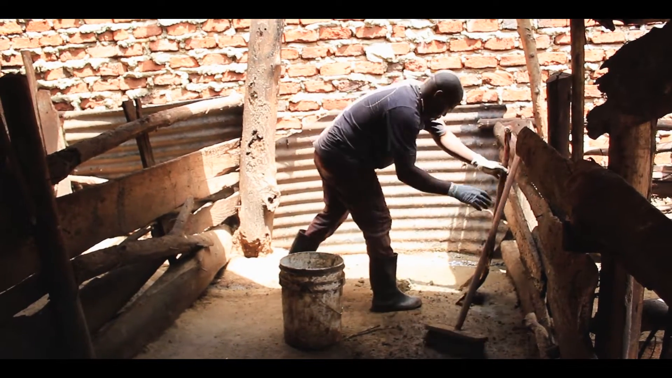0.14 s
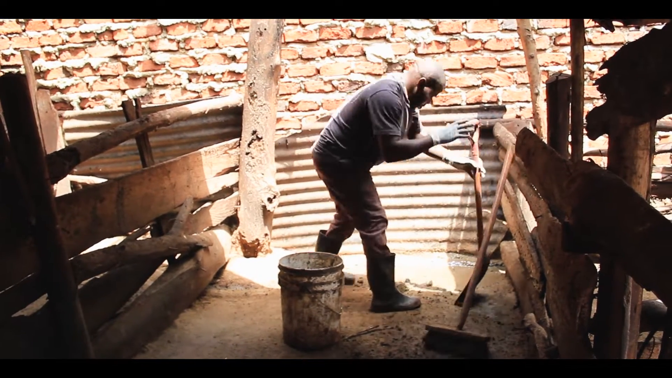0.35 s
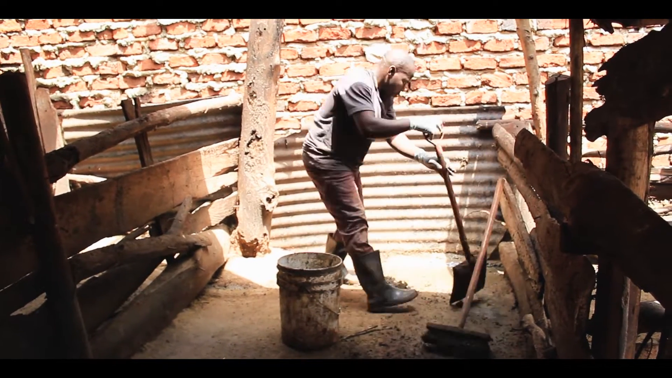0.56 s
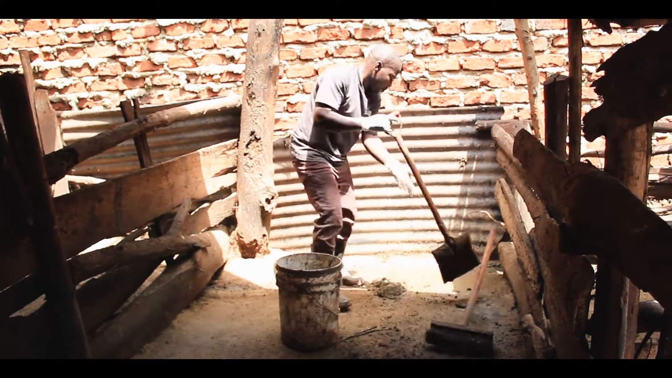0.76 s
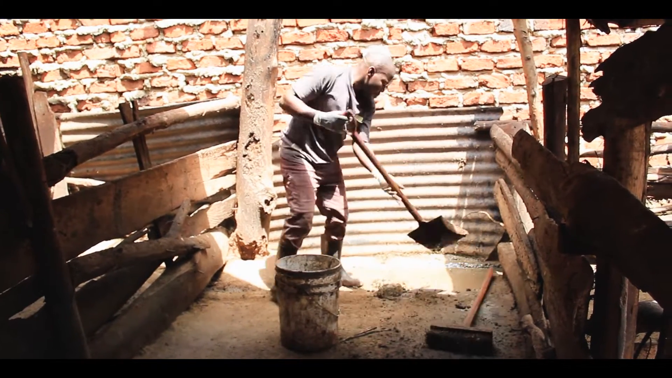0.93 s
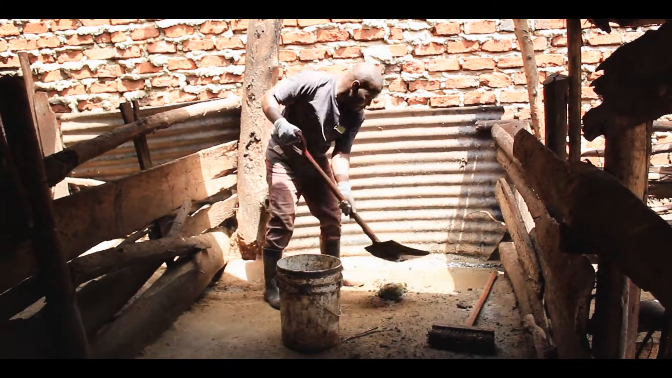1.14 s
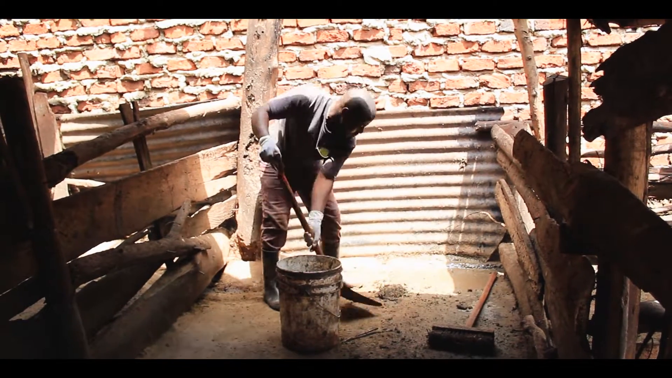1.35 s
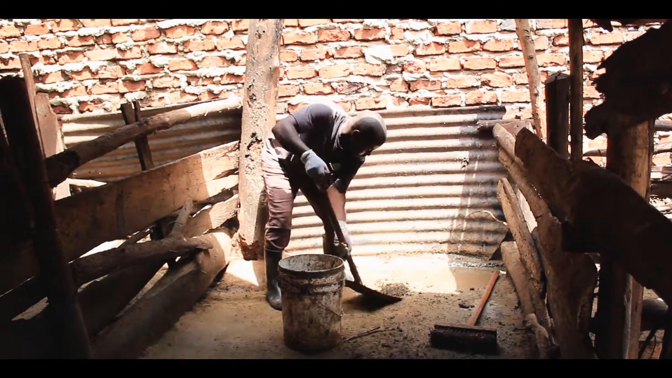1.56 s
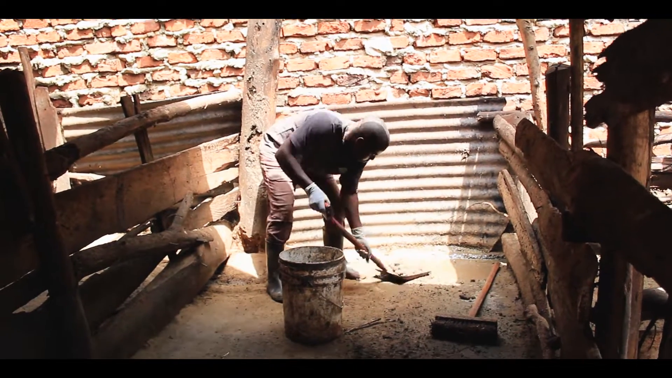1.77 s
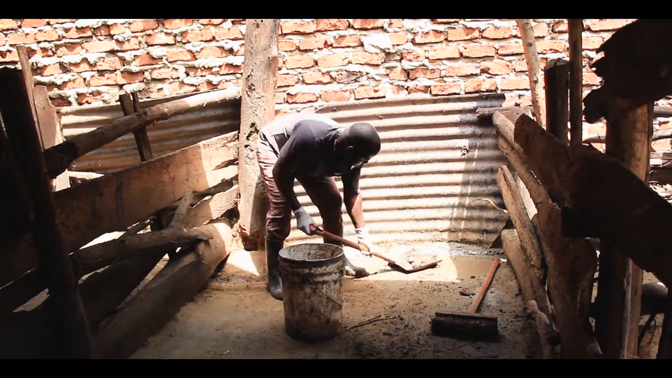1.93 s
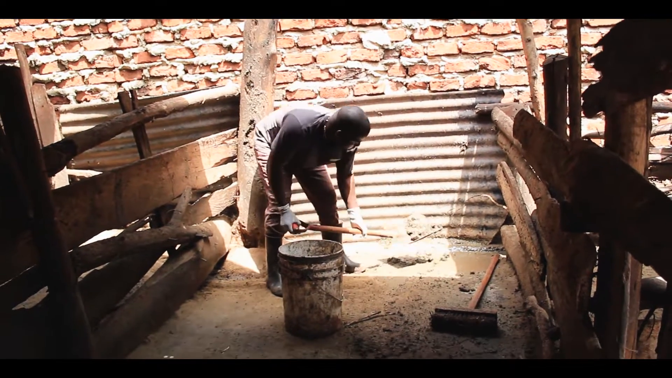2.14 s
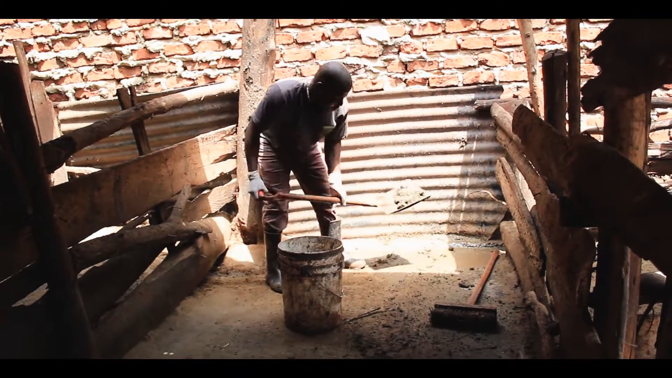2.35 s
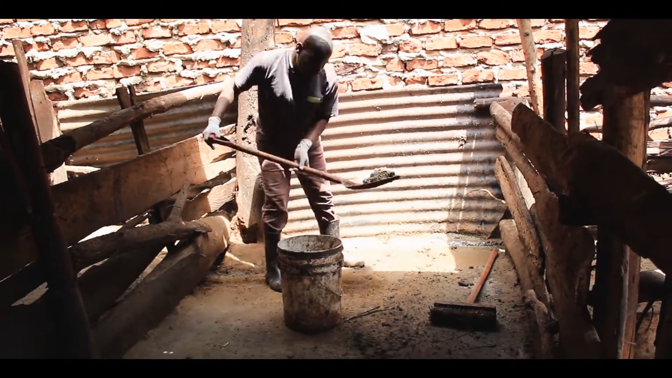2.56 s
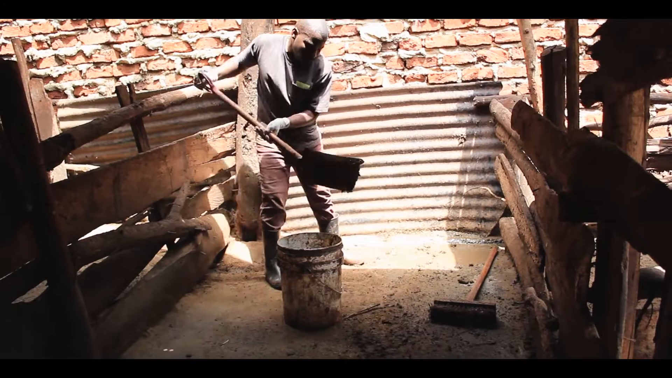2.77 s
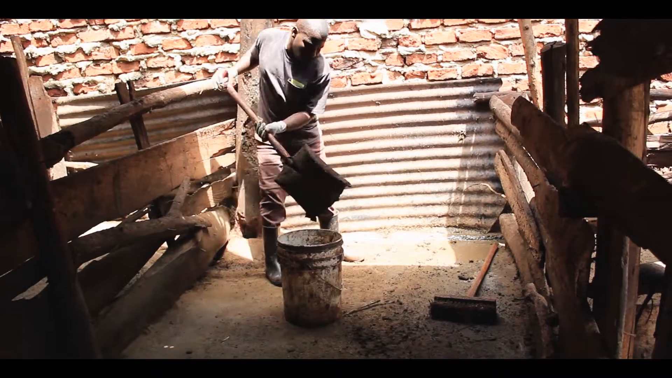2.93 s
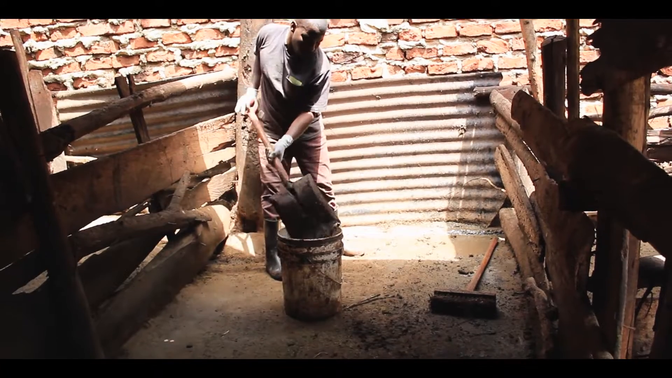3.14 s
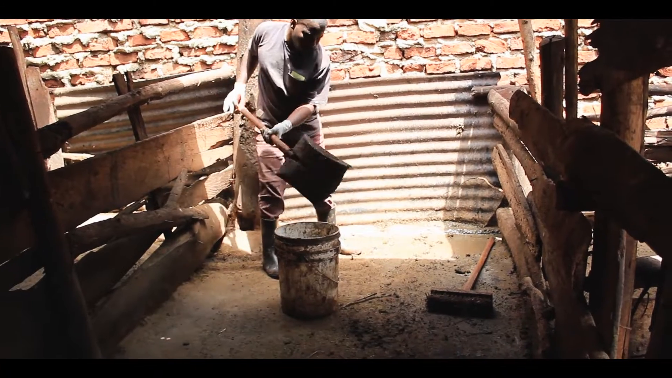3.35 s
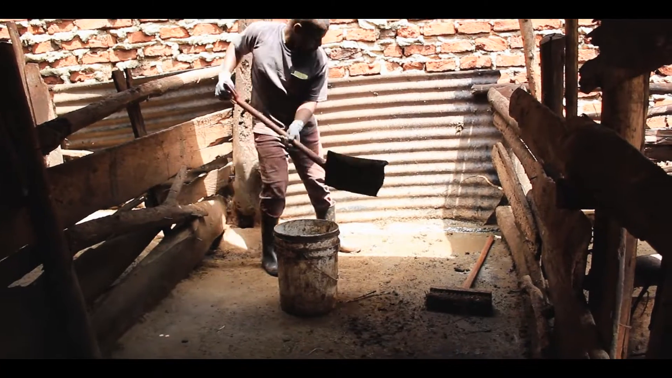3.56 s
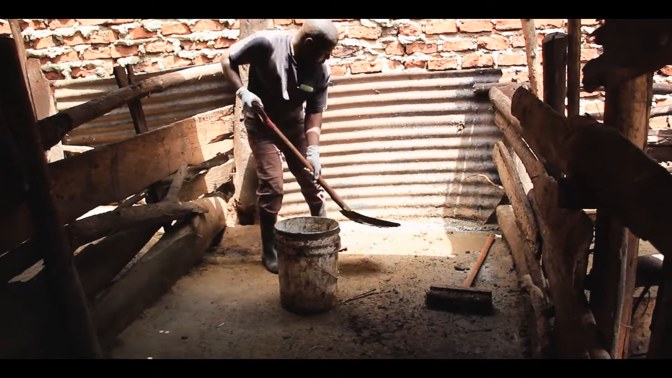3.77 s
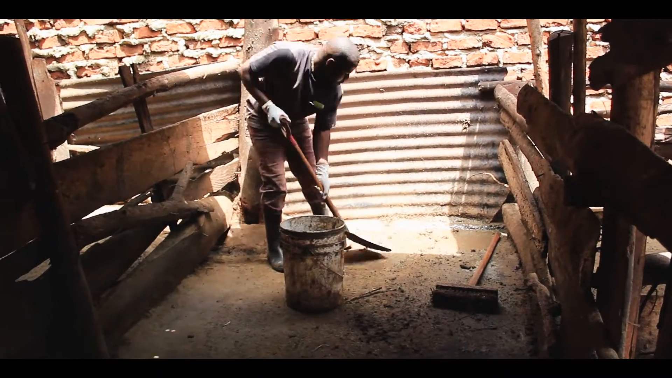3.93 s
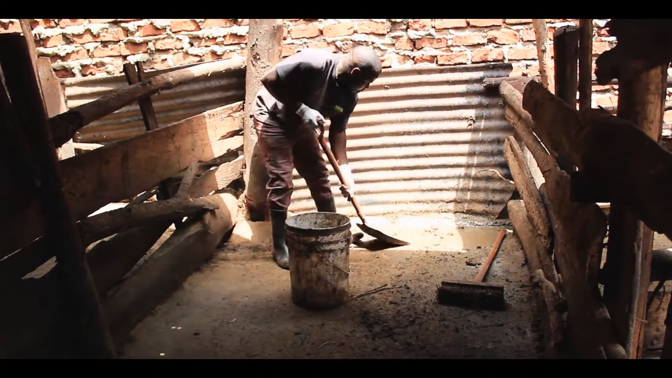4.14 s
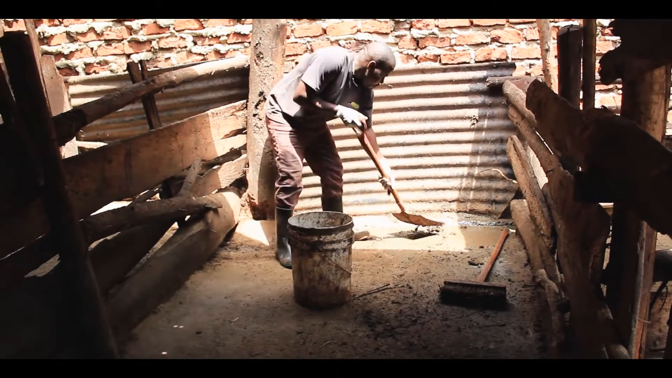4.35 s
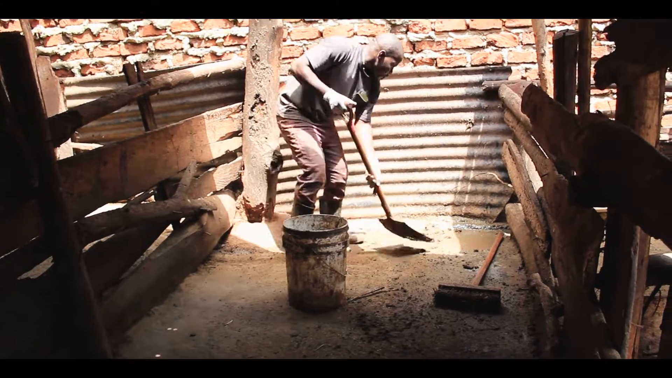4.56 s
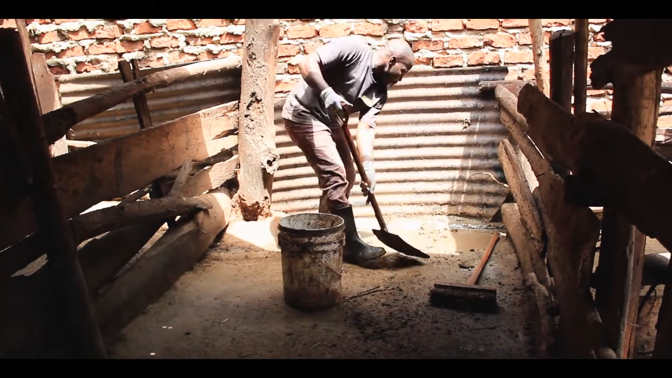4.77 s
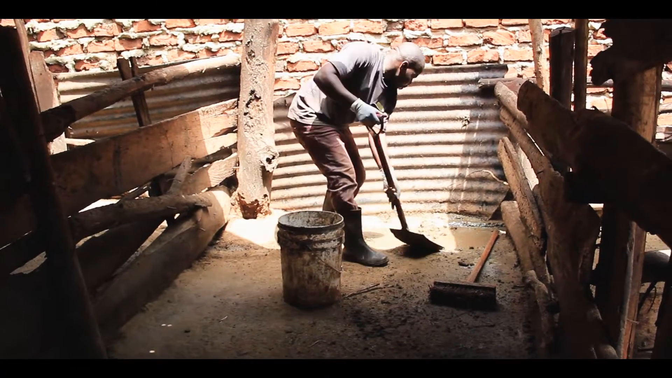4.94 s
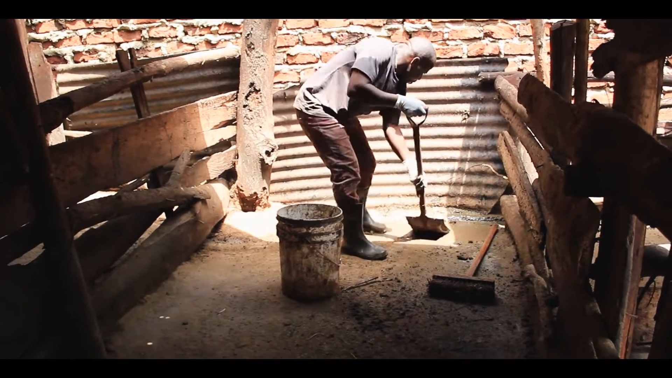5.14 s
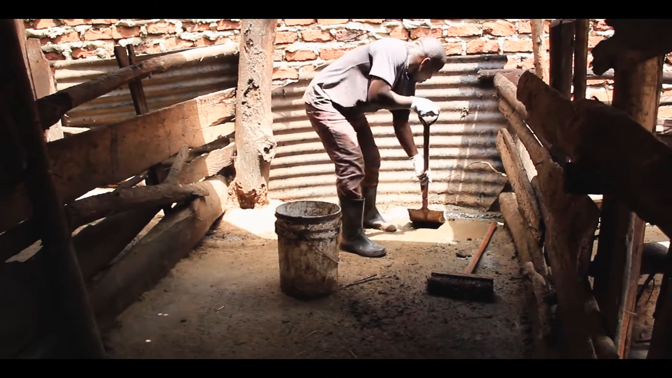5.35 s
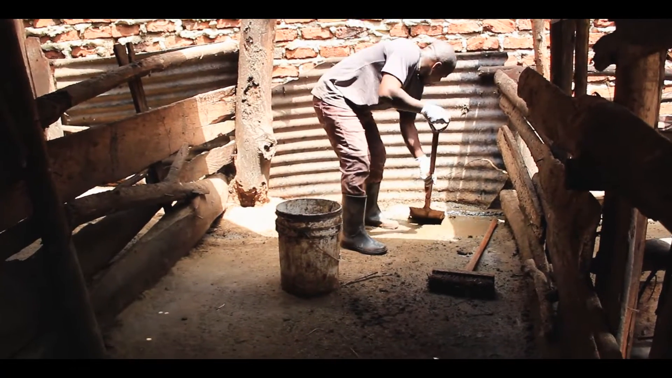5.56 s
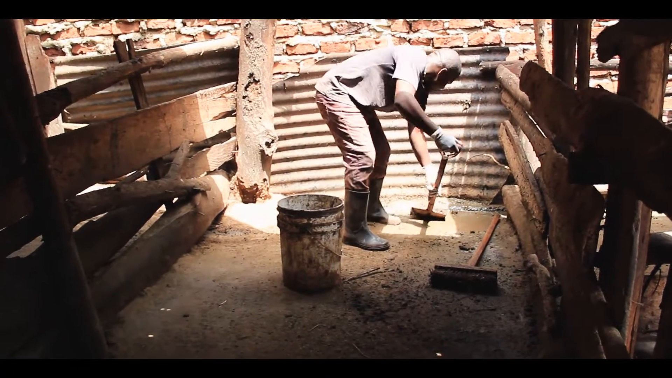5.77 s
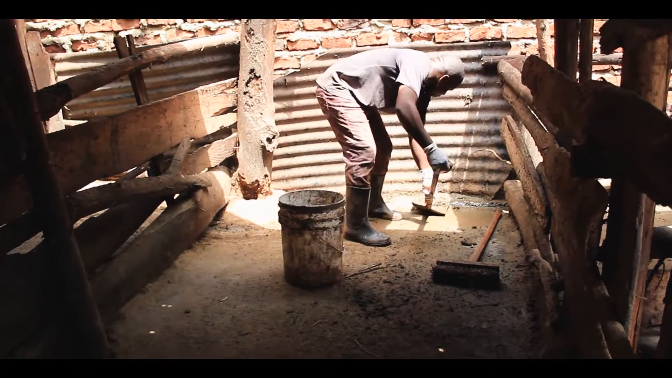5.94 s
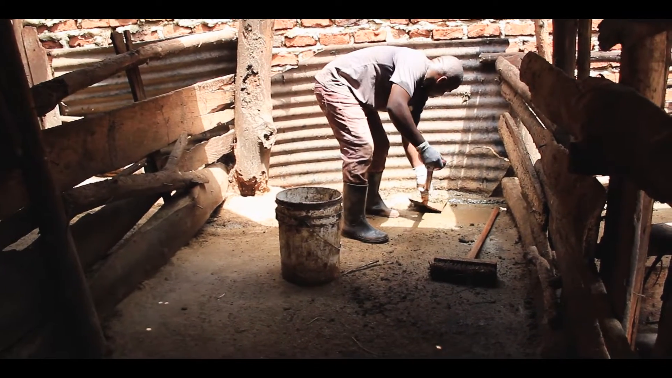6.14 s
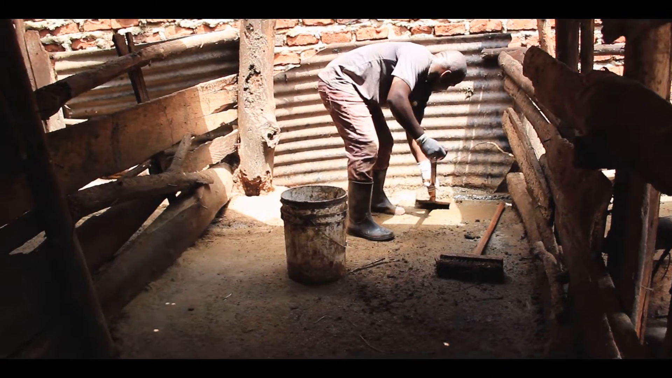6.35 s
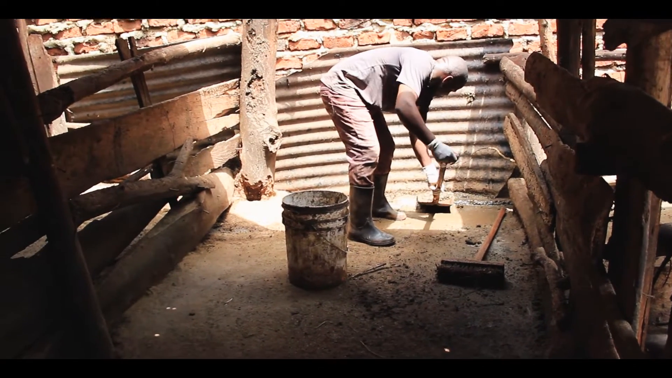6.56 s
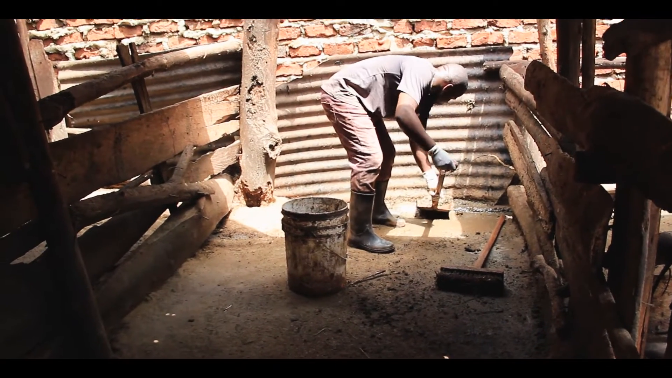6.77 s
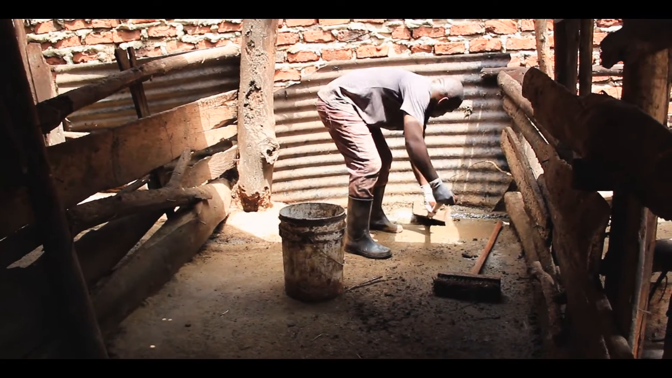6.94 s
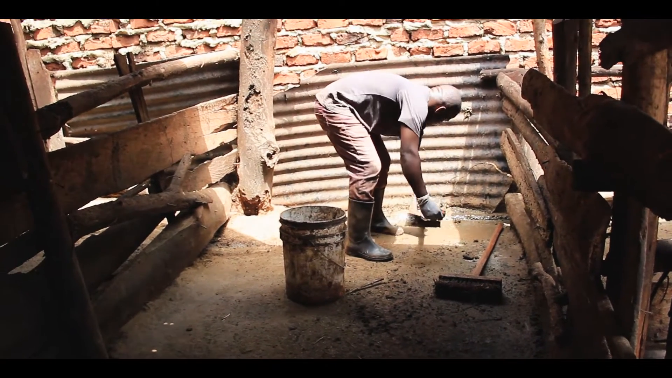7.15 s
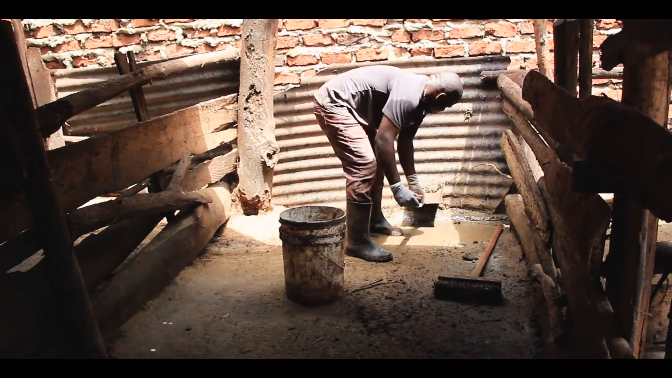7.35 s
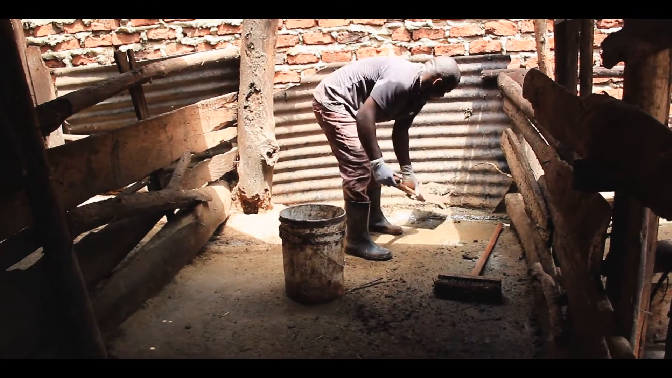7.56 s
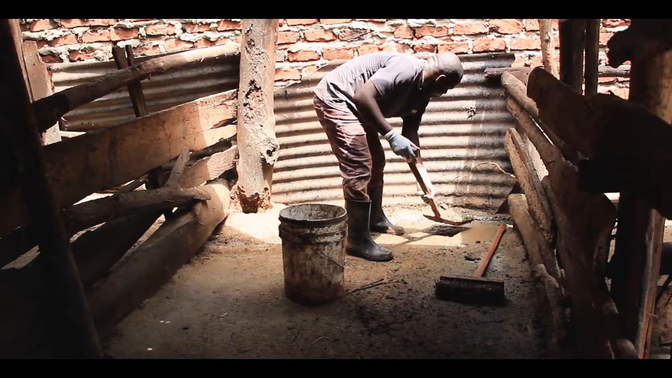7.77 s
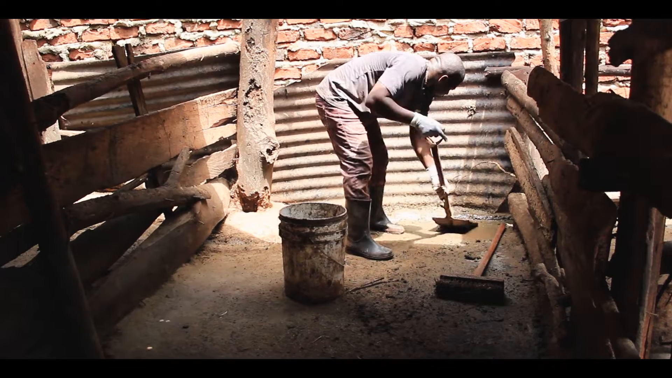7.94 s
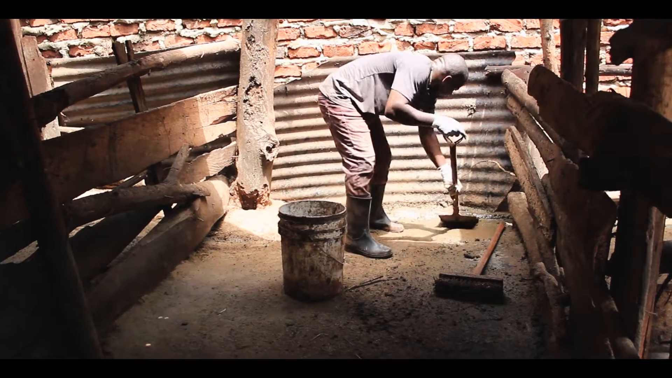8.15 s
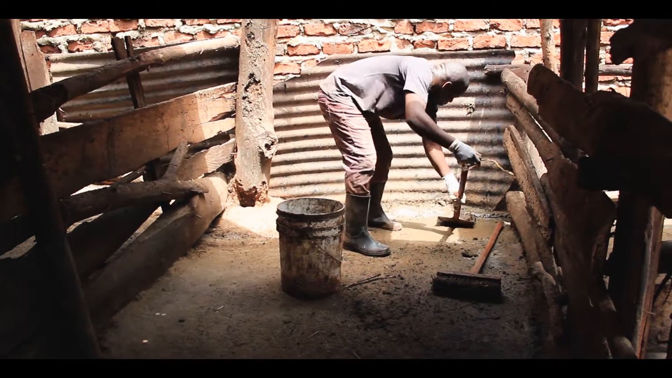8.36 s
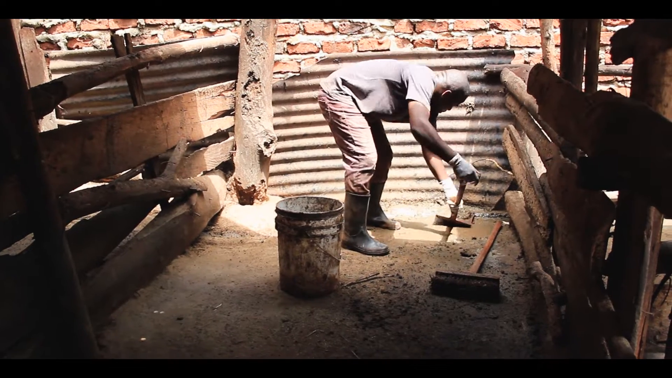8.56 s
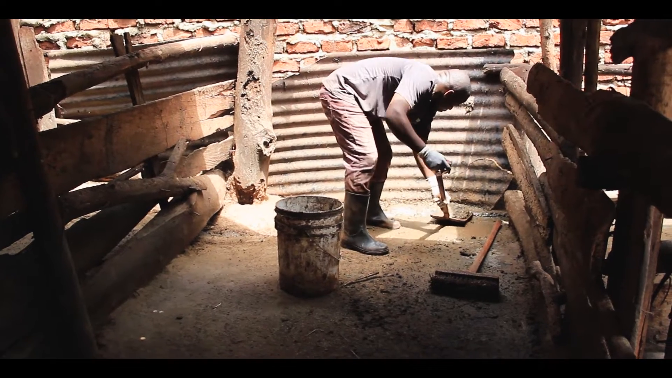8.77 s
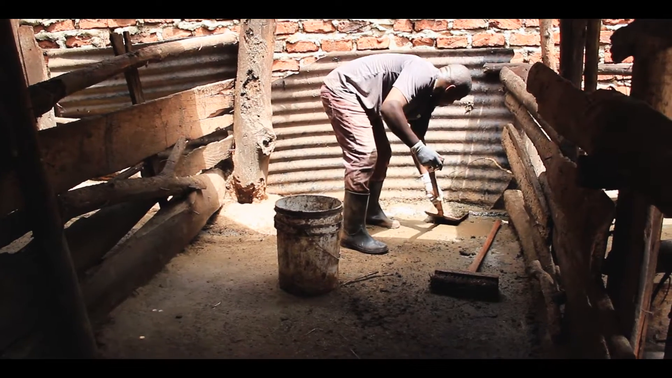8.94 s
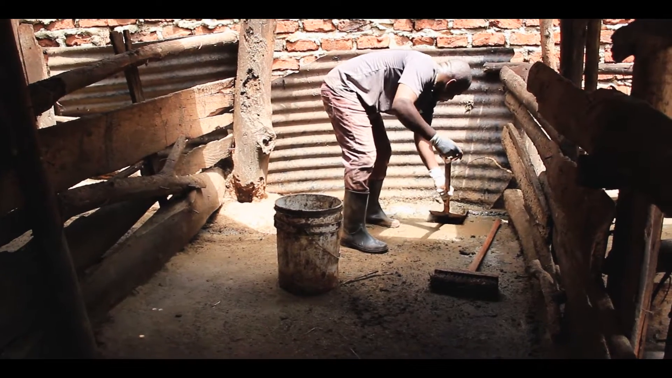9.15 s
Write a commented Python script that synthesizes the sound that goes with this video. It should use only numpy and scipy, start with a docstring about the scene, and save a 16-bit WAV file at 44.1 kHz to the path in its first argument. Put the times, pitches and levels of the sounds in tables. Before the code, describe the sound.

A loud wooden and metallic knock opens, then a very hard ringing clang near one second overloads. A spade rasps across a gritty floor in a strong push, pauses while faint rising glugs come from next door, then scrapes again in rougher strokes. Short scuffs, boot thuds, a small squeak and more knocks follow. Close microphone, small dry pen, quiet steady outdoor wash.

```python
"""Spade scraping in a small pen

A spade scrapes grit and dung over the hard floor of a timber and tin pen: shaped noise under a pressure curve.
The blade knocks and rings as noise bursts with damped modes, and squeaks once as a short harmonic tone.
Boots thud as decaying sines; short rising glugs from next door, like an animal drinking, are gliding tones.
Sparse reflections and a steady outdoor wash surround them; the loudest blows overload at full scale."""
import sys
import numpy as np
from scipy import signal
from scipy.io import wavfile
from scipy.ndimage import uniform_filter1d

SR = 44100
rng = np.random.default_rng(int(sys.argv[2]) if len(sys.argv) > 2 else 0)


def to_wav(s):
    """Save 16-bit WAV."""
    ch = np.atleast_2d(s).T  # columns
    pcm = np.round(np.clip(ch, -1, 1) * 32767)  # PCM
    wavfile.write(sys.argv[1], SR, pcm.astype(np.int16))


N = 406161  # samples

# spectrum of the outdoor wash: (frequency [Hz], relative density [dB])
AIR_SPECTRUM = [(15, -48), (25, -3.5), (161, 2), (299, 12), (436, 7.5), (1030, -1), (1320, -7.5),
                (1970, -8.5), (3380, -19), (8020, -6.5), (14100, -48), (15700, -63)]
AIR_DB = -50  # rms level of the wash

# spectrum of snapping grit: (frequency [Hz], relative density [dB])
GRIT_SPECTRUM = [(120, -55), (307, -14.5), (566, -10), (886, -5.5), (1160, -3.5), (1450, -3), (3000, -5.5),
                 (6680, -12), (10300, -25.5), (15700, -59)]
# three long pushes of the blade along the floor, one curve each: (time [s], pressure [dB])
PUSH_CURVES = [
    [(1.537, -25), (1.555, -15), (1.588, -20), (1.63, -14), (1.665, -4), (1.72, -9), (1.77, -10),
     (1.79, -16), (1.945, -27)],
    [(4.122, -29), (4.152, -19), (4.34, -10), (4.4, -11), (4.49, -38)],
    [(4.95, -13), (5.07, -19), (5.188, -16), (5.196, -7), (5.278, -14), (5.36, -13), (5.55, -13),
     (5.612, -35)],
]
EDGE_DB_PER_S = 6000  # how fast a push lands and lifts
# short scuffs of blade and boots:
# (time of peak [s], pressure [dB], swell over 20 dB [s], fade over 20 dB [s])
SCUFF_EVENTS = [(0.529, -35, .1, .1), (0.66, -33, .01, .1), (0.74, -18, .008, .12), (2.66, -37, .01, .12),
                (2.997, -36, .02, .15), (3.302, -27, .03, .1), (5.25, -7, .03, .04), (5.432, -7, .03, .03),
                (3.836, -34, .15, .3), (5.627, -26, .015, .08), (5.721, -21, .006, .04),
                (5.815, -19, .12, .06), (5.9, -26, .06, .2), (5.99, -26, .1, .15), (6.272, -35, .008, .12),
                (6.357, -19, .02, .06), (6.63, -24, .04, .1), (6.662, -21, .006, .07), (7.09, -29, .1, .07),
                (7.966, -18, .005, .12), (8.122, -15.5, .1, .15), (8.186, -19, .1, .08),
                (8.355, -32, .008, .2), (8.411, -15, .012, .06), (8.556, -13, .008, .075),
                (8.81, -34, .12, .08), (8.988, -35, .1, .1), (9.145, -31, .02, .15)]
# faint shuffling between the strokes: (time [s], pressure [dB])
SHUFFLE_CURVE = [(0, -38.5), (.095, -34.5), (.7, -40), (1.5, -49), (2.03, -41), (2.45, -53), (3.2, -43),
                 (3.7, -56), (4.5, -37), (4.78, -38), (4.95, -52), (6.4, -40), (7.0, -35.5), (7.5, -47),
                 (8.52, -40)]
# colour of the scrape: (time [s], gain above about 3.5 kHz [dB], hum of the pressed blade [dB])
SCRAPE_COLOUR = [(0, -6, -31), (1.7, -3, -32), (3.4, 2.5, -28), (4.2, -1.5, -25), (5.0, -5, -22),
                 (5.95, -4, -18), (6.03, -4.5, -4), (6.15, -4, -20), (8.53, -4, -20), (8.6, -5, -4),
                 (9.2, -3, -11)]
# blade with its edge on the floor: width of its damped modes, their mean gain under load, and one low hum
PRESSED_WIDTH_HZ, PRESSED_DB, HUM_HZ = 100, 5, 745

# modes of the blade held free: (frequency [Hz], level [dB], t60 [s])
BLADE_MODES = [(510, -8, .15), (815, -10, .23), (892, 0, .2), (1180, -15, .25), (1310, -5, .13),
               (1540, -9, .15), (1750, -14, .12), (2170, -13, .18), (2293, -18, .25), (2767, -15, .18),
               (3200, -14, .13)]
# blows of spade and broom on floor, fence and bucket:
# (time [s], level [dB], centre [Hz], t60 [s], blade ring against the blow [dB])
KNOCK_EVENTS = [(0.174, 2.5, 900, 0.14, -19), (0.6, -15, 2000, 0.069, -13), (0.73, 2, 1650, 0.25, -8),
                (0.989, 11.5, 1400, 0.22, -2), (1.141, -14, 544, 0.24, 3), (1.593, -2, 2500, 0.057, -15),
                (1.614, -4, 2500, .05, -15), (1.82, 1, 2300, .06, -25), (1.868, -3, 2800, 0.06, -29),
                (1.951, -9, 3300, .06, -20), (1.994, -14, 2500, .08, -20), (3.435, -21, 2600, .07, -25),
                (3.544, -21, 2900, 0.08, -6), (5.031, -11, 6000, 0.04, -30), (5.097, -7, 3800, .07, -15),
                (5.192, 1, 1500, 0.2, -4), (6.963, -5, 2200, 0.06, -22), (7.4, -24, 5000, .07, -25),
                (7.709, -18, 2720, 0.1, -18), (8.047, -5, 1500, 0.1, -9), (8.455, -4, 1000, 0.096, -22),
                (8.684, -15, 2500, 0.11, -15)]
CRACK_DB = -18  # crack against crunch for a blow centred at 1600 Hz; higher blows crack more

# boots and the load landing: (time [s], level [dB], pitch [Hz])
THUD_EVENTS = [(0.267, -25, 403), (3.299, -31, 215), (6.721, -13, 150), (7.024, -29, 158),
               (7.123, -20.5, 164), (7.387, -32, 287), (7.443, -32.5, 141)]

# rising glugs: (time [s], length [s], first pitch [Hz], last pitch before waver [Hz], level before hollow [dB])
GLUG_EVENTS = [(1.311, 0.078, 320, 1097, -41), (2.029, 0.067, 259, 870, -39.5),
               (2.293, .062, 321, 1505, -36.5), (2.509, 0.078, 324, 1186, -37.5),
               (2.597, 0.06, 324, 833, -41), (2.876, .075, 295.5, 1203, -36.5),
               (4.07, 0.057, 470, 1480, -44), (6.167, 0.036, 444, 920, -30.5),
               (6.793, .04, 565, 1194, -31.5)]
# resonances the glugs sound through: (frequency [Hz], width [Hz], gain [dB])
HOLLOW_MODES = [(332, 167, 4.5), (698, 280, 9), (1210, 200, 11)]

# one squeak of the edge on stone
SQUEAK_S, SQUEAK_HZ, SQUEAK_DB, SQUEAK_T60_S = 7.098, 2360, -19, .13
# its first three harmonics, in order: (relative level [dB])
SQUEAK_HARMONICS = [0, -18, -15]

# decay of the pen's reflections: (frequency [Hz], t60 [s])
PEN_DECAY = [(200, 0.22), (1000, 0.13), (7000, 0.095)]
BAND_LIMIT_HZ = 15900


def gain_of(db):
    """Level law: decibels to amplitude ratio."""
    return 10 ** (np.asarray(db) / 20)


def evened(x):
    """Normalisation: scales to rms 1."""
    return x / np.sqrt(np.mean(x ** 2) + 1e-20)


def read(points, hz):
    """Logarithmic interpolation: reads a curve on a log-frequency axis."""
    f, value = np.transpose(points)
    return np.interp(np.log(hz + 1), np.log(f + 1), value)


def add(mix, s, sound):
    """Superposition: mixes a sound in at s seconds."""
    part = mix[max(round(s * SR), 0):][:len(sound)]
    part += sound[:len(part)]


def resonate(x, hz, width):
    """Damped resonance: one complex pole with gain about 1 at its peak."""
    pole = np.exp((2j * np.pi * hz - np.pi * width) / SR)
    return 2 * signal.lfilter([1 - abs(pole)], [1, -pole], x).real


def resonate_twice(x, hz, width):
    """Cascaded resonance: two equal poles give steeper skirts."""
    return resonate(resonate(x, hz, width), hz, width)


def patchy(noise, bins, frames):
    """Local averaging: smooths noise over frequency bins and time frames into drifting patches."""
    over_hz = uniform_filter1d(noise, size=bins, axis=0)
    return evened(uniform_filter1d(over_hz, size=frames, axis=1))


def air():
    """Stationary filtered noise: a steady outdoor wash with drifting patches."""
    hz = np.fft.rfftfreq(1024, 1 / SR)
    real, imaginary, noise = rng.standard_normal((N // 256 + 5, 513, 3)).T
    level_db = read(AIR_SPECTRUM, hz)[:, None] + 2.5 * patchy(noise, 10, 16)
    z = (real + 1j * imaginary) * gain_of(level_db)
    wash = signal.istft(z, nperseg=1024, noverlap=768)[1][:N]
    return gain_of(AIR_DB) * evened(wash)


def pressure(now):
    """Power addition: pushes, scuffs and shuffling sum into one pressure curve in dB."""
    parts = [np.interp(now, *np.transpose(SHUFFLE_CURVE))]
    for push in PUSH_CURVES:
        s, db = np.transpose(push)
        outside = np.maximum(s[0] - now, 0) + np.maximum(now - s[-1], 0)
        parts.append(np.interp(now, s, db) - EDGE_DB_PER_S * outside)
    for s, db, swell_s, fade_s in SCUFF_EVENTS:
        parts.append(db - 20 * np.where(now < s, (s - now) / swell_s, (now - s) / fade_s))
    return 10 * np.log10(sum(gain_of(part) ** 2 for part in parts))


def rubbing_noise(pressure_db):
    """Stick-slip friction: grains of grit snap under the edge in uneven slips."""
    snaps = gain_of(1.05 * np.minimum(rng.exponential(1, N), 4)) * (rng.random(N) < 3000 / SR)
    rub = evened(snaps * rng.standard_normal(N)) + 1.74 * rng.standard_normal(N)
    # the edge catches and lets go some sixty times a second, each slip dying over 10 ms
    catches = gain_of(4.0 * np.minimum(rng.exponential(1, N), 2)) * (rng.random(N) < 60 / SR)
    slips = signal.lfilter([1], [1, -np.exp(-1 / (.01 * SR))], catches)
    # a light touch skips more than a heavy one
    skip = .22 * gain_of(-.2 * np.maximum(pressure_db + 15, -10))
    return rub * (1 + skip * slips)


def pressed(grit, pressure_db):
    """Loaded-plate modes: damped peaks drift and light up in turn as the edge touches other points."""
    hz, t, z = signal.stft(grit, SR, nperseg=1024, noverlap=768)
    noise = rng.standard_normal((len(t), len(BLADE_MODES), 2))
    sway, drift = evened(uniform_filter1d(noise, size=8, axis=0)).T
    # the modes stand out less under a light load
    load_db = PRESSED_DB + .4 * np.minimum(np.interp(t * SR, np.arange(N), pressure_db) + 22, 0)
    peaks = 0
    for mode, s, d in zip(BLADE_MODES[2:], sway, drift):  # the two lowest modes are choked
        offset = 2 * (hz[:, None] - mode[0] * (1 + .025 * d)) / PRESSED_WIDTH_HZ
        peaks = peaks + gain_of(load_db + 5 * s) / (1 + offset ** 2)
    # the modes take their energy from the grit around them
    around = uniform_filter1d(uniform_filter1d((1 + peaks) ** 2, size=16, axis=0), size=40, axis=1)
    return signal.istft(z * (1 + peaks) / np.sqrt(around), SR, nperseg=1024, noverlap=768)[1][:N]


def scrape():
    """Friction noise through a resonator: the damped blade colours the snapping grit."""
    now = np.arange(N) / SR
    pressure_db = np.interp(now, now[::32], pressure(now[::32]))
    colour_s, treble_db, hum_db = np.transpose(SCRAPE_COLOUR)
    rub = rubbing_noise(pressure_db)
    hz, t, z = signal.stft(rub, SR, nperseg=256)
    patches = patchy(rng.standard_normal((len(t), len(hz))).T, 6, 10)
    z = z * gain_of(read(GRIT_SPECTRUM, hz)[:, None] + 2.3 * patches)
    plain = signal.istft(z, SR, nperseg=256)[1]  # sets the scale before colouring
    # raising or lowering the treble tilts the balance against all below it
    above_treble = 1 / (1 + (3500 / (hz + 1)) ** 4)
    above_treble = above_treble[:, None]
    z = z * gain_of(above_treble * np.interp(t, colour_s, treble_db))
    # a fast, hard stroke gains less in the low body than in the rasp
    body = 1 / (1 + (hz / 900) ** 3)
    z = z * gain_of(-.15 * body[:, None] * (np.interp(t, now, pressure_db) + 22.5))
    grit = signal.istft(z, SR, nperseg=256)[1][:N] / plain.std()
    hum = evened(resonate_twice(rub, HUM_HZ, PRESSED_WIDTH_HZ))
    sound = pressed(grit, pressure_db) + gain_of(np.interp(now, colour_s, hum_db)) * hum
    return gain_of(pressure_db) * sound


def knock(db, hz, t60, ring_db):
    """Impact excitation: a dying crunch with a bright crack, and the free blade's modes left ringing."""
    t = np.arange(SR // 2) / SR
    noise = rng.standard_normal(len(t))
    fade = gain_of(-60 * t / max(t60, .01)) * np.minimum(t / 0.0004, 1)
    body = evened(resonate_twice(noise, hz, 0.9 * hz))
    crack = evened(resonate_twice(noise, 4900, 7000))
    crack_gain = gain_of(CRACK_DB) * (hz / 1600) ** 2 * np.sqrt(fade)  # dies faster than the body
    crunch = fade * (body + crack_gain * crack) / 4
    blade = np.zeros(len(t))
    for f, level, decay in BLADE_MODES:
        distance = abs(np.log2(f / hz))  # octaves; modes near the centre of the blow ring most
        blade += gain_of(level - 10 * distance - 60 * t / decay) * np.sin(2 * np.pi * f * t)
    blade *= np.minimum(t / 0.0029, 1)
    return gain_of(db) * (crunch + gain_of(ring_db) * blade / abs(blade).max())


def thud(db, hz):
    """Heavily damped oscillation: a few cycles of the ground and a short broad knock."""
    t = np.arange(SR // 4) / SR
    rumble = evened(resonate(rng.standard_normal(len(t)), 1.8 * hz, 2.2 * hz))
    envelope = gain_of(db - 60 * t / 0.09) * np.minimum(t / 0.0029, 1)
    return envelope * (np.sin(2 * np.pi * hz * t) + 0.6 * rumble)


def glugs():
    """Bubble resonance: a shrinking air pocket wavers and rises ever faster, heard through a hollow."""
    out = np.zeros(N)
    for s, length, first_hz, last_hz, db in GLUG_EVENTS:
        u = np.arange(0, 1, 1 / (length * SR))  # progress through the glug
        waver = evened(uniform_filter1d(rng.standard_normal(SR // 5), size=120))[:len(u)]
        hz = first_hz * (last_hz / first_hz) ** (u ** 1.2) * (1 + 0.09 * u * waver)
        tone = np.sin(2 * np.pi * np.cumsum(hz) / SR)
        rounded = np.tanh(1.6 * tone + .4)  # lopsided saturation adds harmonics
        add(out, s, gain_of(db) * rounded * signal.windows.tukey(len(u), .15))
    return sum(gain_of(db) * resonate_twice(out, hz, width) for hz, width, db in HOLLOW_MODES)


def squeak():
    """Periodic stick-slip: fast even slips make a short harmonic tone that wavers and dies."""
    t = np.arange(SR // 4) / SR
    waver = evened(uniform_filter1d(rng.standard_normal(len(t)), size=200))
    phase = 2 * np.pi * np.cumsum(SQUEAK_HZ * (1 + .03 * waver)) / SR
    tone = sum(gain_of(db) * np.sin((k + 1) * phase) for k, db in enumerate(SQUEAK_HARMONICS))
    return gain_of(SQUEAK_DB - 60 * t / SQUEAK_T60_S) * np.minimum(t / .006, 1) * tone


def pen(x):
    """Reverberation: sparse reflections off boards, brick and tin, each band dying at its own speed."""
    taps = np.zeros(SR // 2)
    at = np.arange(200, len(taps) - 20, 20)
    taps[at + rng.integers(0, 20, len(at))] = rng.choice([-1., 1.], len(at))  # random sign
    hz, t, z = signal.stft(taps, SR, nperseg=256)
    decay = gain_of(-60 * t / read(PEN_DECAY, hz)[:, None])
    tail = signal.istft(z * decay, SR, nperseg=256)[1]
    return signal.fftconvolve(x, tail / np.linalg.norm(tail))[:N]


def scene():
    """Superposition of direct and reflected sound: the glugs from next door are the wettest."""
    blows = np.zeros(N)
    for s, *row in KNOCK_EVENTS:
        add(blows, s, knock(*row))
    # the blows carry little below 300 Hz
    blows = signal.sosfilt(signal.butter(2, 300, "high", fs=SR, output="sos"), blows)
    for s, *row in THUD_EVENTS:
        add(blows, s, thud(*row))
    add(blows, SQUEAK_S, squeak())
    # air and microphone dull the blows and lose the deep bass
    band = signal.butter(3, [125, 9500], "band", fs=SR, output="sos")
    blows = signal.sosfilt(band, blows)
    far = glugs()
    rubbing = signal.sosfilt(signal.butter(2, 200, "high", fs=SR, output="sos"), scrape())
    wet = pen(gain_of(-8) * blows + gain_of(-15.5) * rubbing + gain_of(-7) * far)
    return (blows + rubbing + far + wet + air())[None]


def record(dry):
    """Overload and band limitation: hard limiting at full scale, then a steep low-pass."""
    limited = np.clip(dry, -1, 1)
    low_pass = signal.firwin(511, BAND_LIMIT_HZ, window=("kaiser", 9), fs=SR)
    return signal.oaconvolve(limited, low_pass[None], "same")


dry = scene()
out = record(dry)
to_wav(out)
```